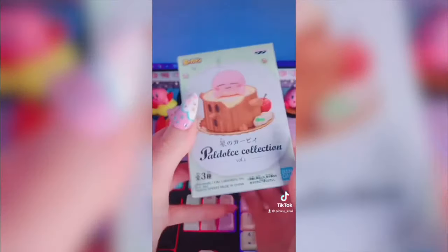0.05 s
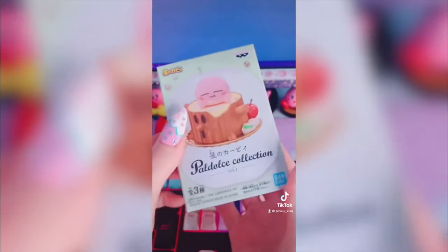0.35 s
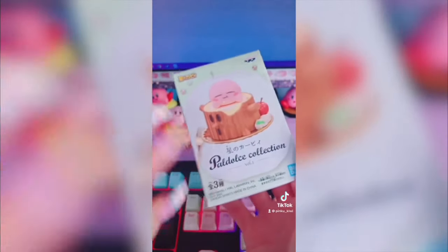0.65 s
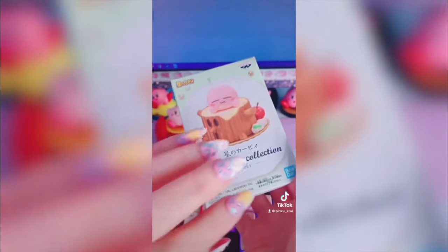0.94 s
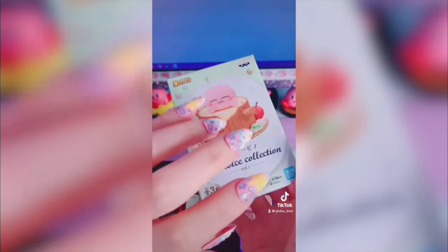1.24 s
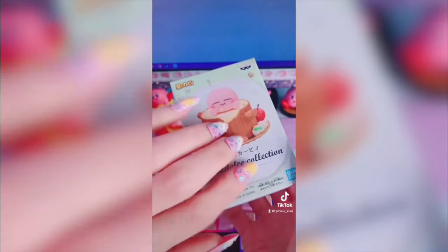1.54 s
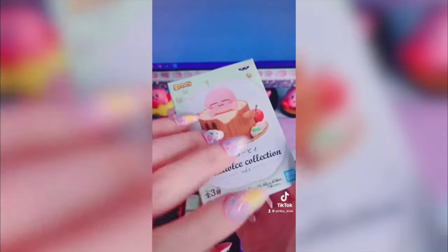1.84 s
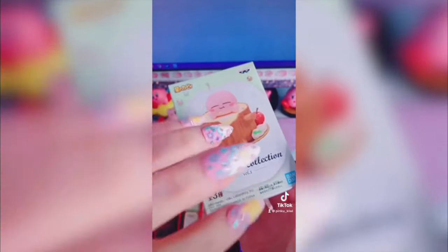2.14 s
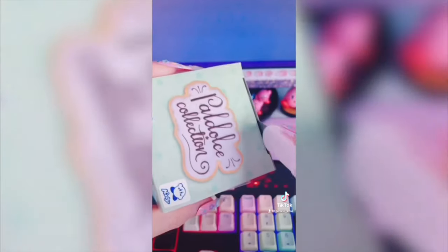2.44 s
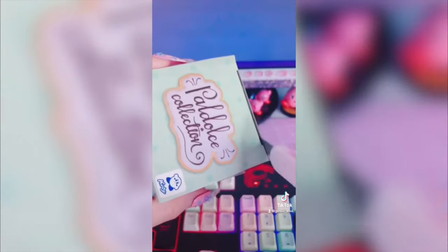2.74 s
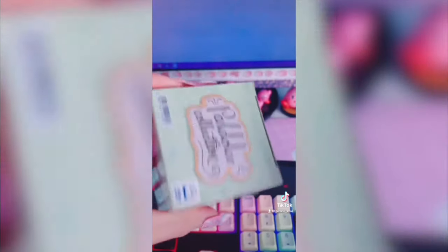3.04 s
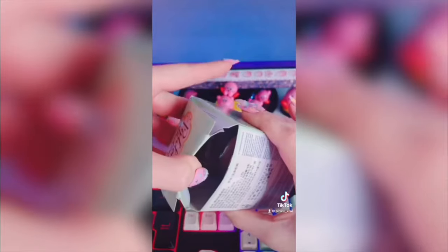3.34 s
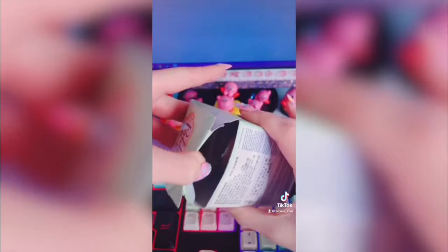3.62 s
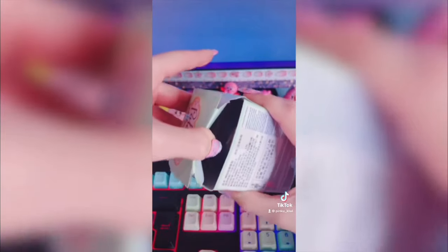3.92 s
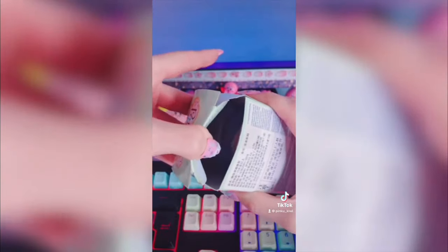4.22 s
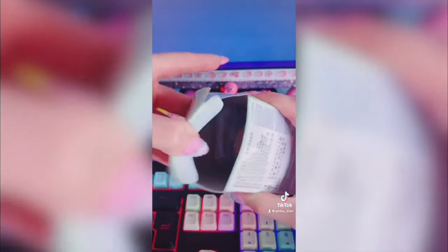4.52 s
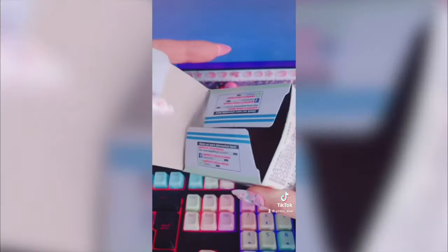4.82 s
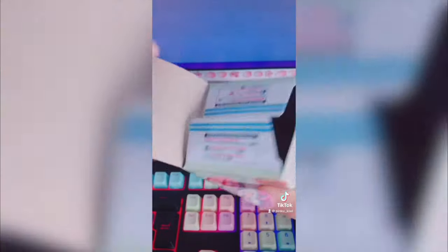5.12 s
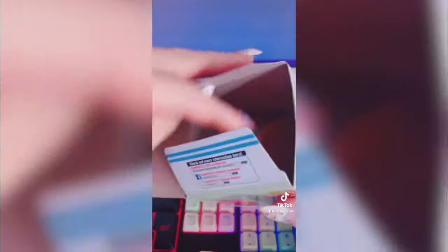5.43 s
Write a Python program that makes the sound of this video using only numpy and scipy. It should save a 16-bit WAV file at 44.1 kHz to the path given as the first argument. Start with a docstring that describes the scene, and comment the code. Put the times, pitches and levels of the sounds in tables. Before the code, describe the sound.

A small cardboard box is handled close to the microphone in a quiet room, with a low rumble from the hands throughout. After a faint rub at the start, long fingernails drum on the box from about 1.2 to 2 seconds, in two quick runs and a last light tap, each crisp and hollow with a faint echo. From 2.1 to 3 seconds, hands rub the card and turn it over, with a few clicks. A thumb starts rasping at the seam around 3.1 seconds, followed by scattered small cracks. From 4 seconds the tearing grows louder and more crackly, until the seam bursts with a sharp snap at about 4.4 seconds and the lid briefly scrapes free. From 4.8 to about 5.7 seconds, the flaps slide over each other with a softer, dry scraping and several light flicks.

```python
"""A small cardboard box is torn open close by: a thumb rasps along the seam, snapping fibres until
it bursts and the lid scrapes free. Before that, long fingernails drum on the box, ringing its walls
and the air inside, and hands rub on it as they turn it over. Afterwards the flaps slide apart and
are flicked back. Behind it all are a low rumble from the hands and a quiet room with a faint echo."""
import sys
import numpy as np
from scipy import signal
from scipy.fft import rfft, irfft, next_fast_len
from scipy.io import wavfile
from scipy.ndimage import uniform_filter1d, map_coordinates

SR = 44100
rng = np.random.default_rng(int(sys.argv[2]) if len(sys.argv) > 2 else 0)


def int16_out(signal):
    """Quantize to a 16-bit WAV file."""
    q = np.round(np.clip(np.atleast_2d(signal).T, -1, 1) * 32767)
    wavfile.write(sys.argv[1], SR, q.astype(np.int16))


N = 250047
GIVE_S = 4.418  # the moment the seam gives way
CLICK_HZ = 2500  # the walls sound below this, clicks and hiss above


# Thumb pushes on the seam. Each row: start and length in seconds, relative wall and fibre levels in dB.
THUMB_PUSHES = [(3.121, 0.035, -41.5, -49), (3.2, 0.037, -42, -50.5), (3.266, 0.027, -43.5, -51),
                (4.031, 0.041, -43, -47.5), (4.06, 0.053, -35.5, -46), (4.156, .032, -35, -42.5),
                (4.2, 0.041, -48, -60.5), (4.253, 0.038, -36.5, -45.5), (4.304, .114, -34.5, -45.5)]
# The freed lid brushes, then scrapes the rim. Each row: start and length in seconds, relative level in dB.
LID_STROKES = [(4.43, 0.048, -43.5), (4.472, 0.02, -24)]
# How the seam and the lid ring. Each row: pitch in Hz, width in Hz, relative level in dB.
SEAM_RINGS = [(327, 230, -5), (797, 179, 1), (943, 168, -2), (1503, 170, -3), (1740, 414, -8)]
LID_RINGS = [(626, 81, -7), (945, 50, 2.5), (1460, 100, 0), (2230, 98, -2.5), (4100, 1000, -11.5),
             (6200, 800, -13.5)]
# The tone of breaking fibres. Each row: frequency in Hz, relative level in dB.
FIBRE_TONE = [(1500, -30.5), (2400, -3.5), (4000, 1), (6000, 0.5), (7500, -7), (9500, -4), (11500, -11.5),
              (16000, -11)]

def tearing(fibre_db=-1, lid_db=-1, run_s=4.275, run_db=17.5):
    """Fibres catch and break by the thousand and shake the walls; then the lid scrapes free."""
    wall, _ = strokes(THUMB_PUSHES, attack_s=0.014, release_db_per_s=478.5, flutter_db=1.0)
    _, fibre = strokes(THUMB_PUSHES, attack_s=0.015, release_db_per_s=382, flutter_db=-0.5)
    # once the tear runs, the fibres grow louder until the seam gives
    fibre *= amp(np.interp(np.arange(N) / SR, [run_s, GIVE_S], [0, run_db], right=0))
    breaks = slips(rate=6000, spread_db=-1)
    bundles = slips(rate=350, spread_db=1.5)  # whole bundles part with a crisper tick
    crackle = shifting(coloured(breaks + amp(-7) * bundles, FIBRE_TONE), depth_db=2.5)
    body = resonated(breaks + amp(-5) * bundles, SEAM_RINGS)
    rasp = wall * body + amp(fibre_db) * fibre * crackle
    drag = slips(rate=12000, spread_db=1)
    lid = band(resonated(drag, LID_RINGS), [450, 7000], "bandpass")
    lid += amp(-17) * coloured(drag, FIBRE_TONE)  # torn fibres hiss on its edge
    contact, = strokes(LID_STROKES, attack_s=0.0059, release_db_per_s=2500.5)
    return band(rasp, 160, "highpass", order=2) + amp(lid_db) * contact * lid


# The last strip of card parts: start and length in seconds.
STRIP_RIP = (4.4280, .0065)

def burst(swing_hz=205, swing_s=0.015, jolt_hz=92, jolt_t60=0.12, rip_hz=3500, rip_width_hz=3200):
    """The seam lets go: the wall springs back and pumps the air, the box jolts, the last strip rips."""
    out = np.zeros(N)
    t = np.arange(round(swing_s * SR)) / SR
    add(out, GIVE_S, amp(-14) * np.sin(np.pi * t / swing_s) * np.sin(2 * np.pi * swing_hz * t))
    t = np.arange(SR // 5) / SR
    add(out, GIVE_S, amp(-32 - 60 * t / jolt_t60) * np.sin(2 * np.pi * jolt_hz * t))
    start, length = STRIP_RIP
    swell = np.hanning(round(length * SR))
    rip = resonated(rng.standard_normal(len(swell)), [(rip_hz, rip_width_hz, 0)])
    add(out, start, amp(-13) * swell * rip)
    return out


# Nails on the box. Each row: start in seconds, panel pitch in Hz, levels of the walls, the hollow
# inside and the click in dB, extra treble in the click in dB.
NAIL_TAPS = [(1.2001, 680, -46, -51, -54, -9), (1.2948, 670, -35, -46, -41, -5.5),
             (1.3555, 885, -31, -44, -37, 1), (1.6135, 700, -44.5, -54, -47, -3),
             (1.646, 660, -36.5, -38.5, -42, -2.5), (1.69, 670, -29, -38.5, -33.5, -9),
             (1.749, 850, -30.5, -49, -39.5, -2), (1.9927, 692, -47.5, -55.5, -47.5, -1)]
# How the closed box rings. Each row: pitch in Hz, relative level in dB, longest fade in seconds.
BOX_RINGS = [(136, -12, 0.031), (270, -12, 0.038), (374, -8, 0.038), (720, -4.5, 0.029),
             (1200, -5.5, 0.023), (1500, -3, 0.019), (2190, -10, 0.024), (2420, -5, 0.0083),
             (2940, -12, 0.013), (3480, -3.5, 0.011), (4060, -8.5, .02), (5580, -11, 0.02),
             (6900, -23, 0.054)]

def taps(panel_t60=0.025, tick_t60=0.016, nail_hz=4500, vary_db=2):
    """Each nail ticks on the card and rings the box, most of all the panel under it."""
    out, t = np.zeros(N), np.arange(SR // 10) / SR
    hz, db, t60 = np.transpose(BOX_RINGS)[:, :, None]  # t60: seconds to fade by 60 dB
    t60 = np.minimum(t60, 100 / hz)  # card soaks up motion: no ring outlasts a hundred cycles
    for start, panel_hz, *levels_db in NAIL_TAPS:
        strength = db + vary_db * rng.standard_normal(hz.shape)
        sign = rng.choice([-1, 1], hz.shape)  # where the nail lands sets which way each ring starts
        # resting fingers load the card and shift its higher rings from tap to tap
        pitch = hz * (1 + np.minimum(hz / 40000, 0.07) * rng.standard_normal(hz.shape))
        ring = np.sum(sign * amp(strength - 60 * t / t60) * np.sin(2 * np.pi * pitch * t), axis=0)
        panel = amp(-60 * t / panel_t60) * np.cos(2 * np.pi * panel_hz * t)
        noise = band(rng.standard_normal(len(t)), nail_hz, "lowpass", order=1)
        tick = amp(5 - 60 * t / tick_t60) * noise
        add(out, start, box_blow(ring + panel + tick, *levels_db))
    return out


# Short cracks and clicks. Each row: start in seconds, ring pitch in Hz, levels of the walls,
# the hollow inside and the click in dB, extra treble in the click in dB.
SHORT_CRACKS = [(2.2356, 805, -46.5, -47, -44.5, 12), (2.251, 730, -59, -53, -55.5, 3),
                (2.268, 687, -46, -46, -46.5, 8), (2.885, 4000, -77, -85, -75.5, 9),
                (3.115, 5500, -84, -97, -65.5, 4), (3.209, 750, -54, -60, -71, 12),
                (3.469, 754, -58.5, -63, -62, -0.5), (3.5733, 910, -65, -71, -60.5, 4),
                (3.6065, 3300, -71, -85, -70, -1), (3.629, 5570, -61, -77, -66, 3),
                (3.6471, 1504, -42.5, -91, -50, 5), (3.663, 1630, -50.5, -84, -66, 9),
                (3.8021, 940, -64.5, -75, -74.5, -2), (3.948, 780, -71, -82, -90, -6),
                (4.4176, 930, -36, -41, -41, 10), (4.4204, 816, -31, -33.5, -25.5, -2.5),
                (4.4283, 2210, -35.5, -40.5, -39.5, 1), (4.5985, 713, -56.5, -61, -70, 2.5),
                (4.707, 487, -69, -65.5, -76, -3), (5.0448, 717, -60, -69, -75, -12),
                (5.207, 1470, -46, -69, -58, -6), (5.212, 940, -47, -51.5, -48, -1),
                (5.3013, 520, -64, -55, -59.5, -11), (5.3849, 520, -54, -51.5, -66, 1),
                (5.5713, 1180, -46.5, -50.5, -54.5, 1), (5.6131, 2100, -61.5, -48.5, -52.5, 1),
                (5.6626, 990, -43, -50.5, -65, -6)]
# The tone of a crack. Each row: frequency in Hz, relative level in dB.
CRACK_TONE = [(60, -2.5), (170, 6.5), (300, 3.5), (480, -1.5), (800, 2), (1600, 2.5), (2600, -4.5),
              (4200, -3), (7000, -9), (11000, -16.5), (16000, -21)]

def cracks(rise_s=0.00074, crack_t60=0.034, ring_t60=0.035, hollow_hz=450):
    """Nails knock on the box, card buckles and flicks: each makes a short crack and a brief ring."""
    out, t = np.zeros(N), np.arange(SR // 10) / SR
    for start, ring_hz, *levels_db in SHORT_CRACKS:
        crack = coloured(rng.standard_normal(len(t)), CRACK_TONE)
        ring = resonated(rng.standard_normal(len(t)), [(ring_hz, 0.09 * ring_hz, 0)])
        # a small piece of card gives off little below its own pitch; the air inside supplies the lows
        crack = band(crack, max(hollow_hz, 0.8 * ring_hz), "highpass") + band(crack, hollow_hz, "lowpass")
        blow = crack * amp(-60 * t / crack_t60) + ring * amp(1 - 60 * t / ring_t60)
        add(out, start, box_blow((1 - np.exp(-t / rise_s)) * blow, *levels_db))
    return out


def box_blow(x, wall_db, hollow_db, click_db, crisp_db, crisp_hz=7500):
    """A blow is shared among the walls, the air inside and a click, crisper for a harder contact."""
    hollow = band(x, [125, 370], "bandpass", order=2)
    wall = band(x, [580, CLICK_HZ], "bandpass", order=2)
    click = band(x, CLICK_HZ, "highpass", order=2)
    click = band(click, crisp_hz, "lowpass") + amp(crisp_db) * band(click, crisp_hz, "highpass")
    return amp(wall_db) * unit(wall) - amp(hollow_db) * unit(hollow) - amp(click_db) * unit(click)


# Hands sliding. Each row: start and length in seconds, relative wall and hiss levels in dB.
PALM_STROKES = [(.08, 0.23, -76, -73.5), (2.12, 0.2, -50, -56.5), (2.27, 0.021, -40, -58),
                (2.32, 0.13, -58, -69), (2.43, 0.17, -53.5, -64), (2.485, .17, -49.5, -57),
                (2.53, 0.04, -42, -66), (2.728, 0.025, -50, -55.5), (2.78, 0.22, -67.5, -72.5),
                (3.47, 0.12, -60, -65.5)]
# The tone of skin on card. Each row: frequency in Hz, relative level in dB.
PALM_TONE = [(150, 8.5), (450, -9.5), (700, 1), (1100, -5.5), (2000, -8.5), (3200, -17), (5000, -20.5),
             (8500, -24.5), (11000, -30.5), (16000, -26.5)]

def turning():
    """Palms and fingertips rub the box as they turn it and shift their grip."""
    grip = strokes(PALM_STROKES, attack_s=0.022, release_db_per_s=602, flutter_db=1.0)
    return sliding(grip, PALM_TONE, rate=7700, wall_db=-5.0, hiss_db=-0.5)


# Flaps sliding. Each row: start and length in seconds, relative wall and hiss levels in dB.
FLAP_STROKES = [(4.81, 0.07, -60, -63), (4.86, .13, -58, -59.5), (5.0, 0.056, -57.5, -58),
                (5.07, 0.082, -62.5, -67), (5.122, 0.045, -48, -52), (5.18, 0.036, -57, -63),
                (5.22, .15, -46, -56), (5.315, .048, -49, -47.5), (5.39, 0.056, -56, -59.5),
                (5.47, 0.077, -63.5, -66), (5.55, 0.15, -45, -53.5)]
# The tone of card on card. Each row: frequency in Hz, relative level in dB.
FLAP_TONE = [(88, -27), (150, 6), (328, -1.5), (504, -0.5), (790, 5), (1080, -1), (1480, 0), (1790, -1.5),
             (2700, 1.5), (4160, -6.5), (4760, -12), (5360, -5), (7470, -15), (15100, -19.5), (16000, -24)]

def flaps():
    """The flaps rub over each other as they part."""
    contact = strokes(FLAP_STROKES, attack_s=0.018, release_db_per_s=700, flutter_db=1.2)
    return sliding(contact, FLAP_TONE, rate=6200, wall_db=-2.5, hiss_db=1.5)


def sliding(gains, tone, rate, wall_db, hiss_db):
    """Dry rubbing: tiny slips hiss at the contact and murmur in the walls."""
    wall, hiss = gains
    rub = shifting(coloured(slips(rate, spread_db=1.5), tone), depth_db=4)
    murmur = unit(band(rub, [220, CLICK_HZ], "bandpass", order=2))
    return amp(wall_db) * wall * murmur + amp(hiss_db) * hiss * unit(band(rub, CLICK_HZ, "highpass"))


# Card ringing briefly. Each row: start and length in seconds, pitch and width in Hz, level in dB.
CARD_RINGS = [(2.129, 0.1, 8100, 4000, -58.5), (2.529, 0.069, 4040, 700, -57),
              (2.543, 0.042, 620, 140, -47), (3.66, 0.066, 1640, 400, -56),
              (4.337, 0.083, 3760, 500, -39.5), (4.365, 0.045, 5570, 500, -51),
              (4.472, 0.028, 596, 110, -30.5), (4.977, 0.066, 3850, 880, -61),
              (5.108, 0.081, 3430, 820, -54), (5.236, 0.087, 3100, 935, -54),
              (5.394, 0.086, 2290, 218, -60.5)]

def card_rings():
    """Card rings briefly around one pitch: scraped edges, and a flap ringing on after a snap."""
    out = np.zeros(N)
    for start, length, hz, width, db in CARD_RINGS:
        progress = np.linspace(0, 1, round(length * SR))
        broad = resonated(rng.standard_normal(len(progress)), [(hz, 2 * width, 0)])
        ring = resonated(broad, [(hz, width, 0)])
        add(out, start, amp(db) * np.sqrt(4 * progress * (1 - progress)) * ring)
    return out


def desk(x, delay_s=0.0028, reflect_db=-19, dull_hz=3000):
    """The desk adds a weak, dull copy a moment later."""
    out = x.copy()
    add(out, delay_s, amp(reflect_db) * band(x, dull_hz, "lowpass", order=1))
    return out


# The tone the box sends into the room. Each row: frequency in Hz, gain in dB.
ECHO_TONE = [(80, -25), (150, -3.5), (430, -4), (800, 1), (1500, -3), (2500, -8), (5000, -14), (8000, -21),
             (16000, -34)]

def tap_echoes(boost_db=28.5):
    """All sides of the box sound into the room, so a tap's echo has a smoother tone than the tap."""
    out = np.zeros(N)
    for start, _, wall_db, *_ in NAIL_TAPS:
        add(out, start + 0.0025, amp(boost_db + wall_db) * room_tail())
    return filtered(out, lambda hz: amp(along(ECHO_TONE, hz)))


# How long the room rings. Each row: frequency in Hz, seconds to fade by 60 dB.
ROOM_FADE = [(150, 0.33), (1000, 0.47), (4000, .35), (12000, 0.15)]

def room_tail(build_s=0.0012):
    """A small room's echo builds up quickly, and its treble dies first."""
    hz, t, noise = signal.stft(rng.standard_normal(SR // 2), SR, nperseg=256)
    fade = amp(-60 * t / along(ROOM_FADE, hz)[:, None])
    tail = signal.istft(noise * fade * (1 - np.exp(-t / build_s)), SR, nperseg=256)[1]
    return tail / np.linalg.norm(tail)


# How strongly the hands rumble. Each row: time in seconds, relative level in dB.
RUMBLE_LEVELS = [(0.0, -63), (0.3, -66.5), (2.49, -60.5), (2.84, -63.5), (4.09, -64.5), (4.59, -60.5),
                 (4.85, -60.5), (5.67, -65.5)]
# The tones of the rumble and of the room's air. Each row: frequency in Hz, relative level in dB.
RUMBLE_TONE = [(12, -28), (20, -3), (32, -11.5), (48, 9), (86, -2.5), (112, -13.5), (144, -3.5),
               (200, -7.5), (260, -19.5), (440, -120)]
AIR_TONE = [(59, -32), (100, -10), (143, -1), (170, -12.5), (289, -10), (481, -22.5), (513, -20),
            (1080, -22.5), (1390, -22.5), (2270, -29), (3120, -30), (5300, -34), (16000, -39.5)]

def background(rumble_db=0.5, air_db=-65):
    """The dull rumble of hands on the box, over still room air."""
    hands_db = np.interp(np.arange(N) / SR, *np.transpose(RUMBLE_LEVELS))
    rumble = amp(rumble_db + hands_db) * coloured(rng.standard_normal(N), RUMBLE_TONE)
    return rumble + amp(air_db) * coloured(rng.standard_normal(N), AIR_TONE)


def strokes(rows, attack_s, release_db_per_s, flutter_db=0):
    """One loudness curve for each dB column: a stroke takes hold, flutters with the grip and dies away."""
    t = np.arange(N) / SR
    power = 0
    for start, length, *levels_db in rows:
        rise = np.clip((t - start) / attack_s, 0, 1)
        fall = amp(-release_db_per_s * np.maximum(t - start - length, 0))
        power = power + np.outer(amp(levels_db), rise * fall) ** 2
    return np.sqrt(power) * amp(flutter_db * wobble(rate=70))


def slips(rate, spread_db):
    """A surface sticks and slips: tiny uneven clicks at random times, about rate a second."""
    happens = rng.random(N) < rate / SR
    return unit(happens * rng.standard_normal(N) * amp(spread_db * rng.standard_normal(N)))


def shifting(x, depth_db):
    """A moving contact keeps changing how the card rings: patches of the tone rise and fall at random."""
    spectrum = signal.stft(x, nperseg=512)[2]
    patches = uniform_filter1d(rng.standard_normal(spectrum.shape), size=5, axis=0)
    patches = uniform_filter1d(patches, size=9, axis=1)
    return unit(signal.istft(spectrum * amp(depth_db * unit(patches)), nperseg=512)[1][:N])


def wobble(rate):
    """A smooth curve through rate random points a second."""
    return map_coordinates(rng.standard_normal(int(N * rate / SR) + 4), [np.arange(N) * rate / SR])


def resonated(x, peaks):
    """Ring x at each (pitch in Hz, width in Hz, dB) peak, at an average level of 1."""
    def response(f):
        return sum((-1) ** k * amp(db) * 1j * f * width / (hz * hz - f * f + 1j * f * width)
                   for k, (hz, width, db) in enumerate(peaks))
    return unit(filtered(x, response))


def coloured(x, tone):
    """Shape x with a tone table, at an average level of 1."""
    return unit(filtered(x, lambda hz: amp(along(tone, hz))))


def filtered(x, response):
    """Scale each frequency in x by response(Hz)."""
    size = next_fast_len(len(x) + 8192)
    return irfft(rfft(x, size) * response(np.fft.rfftfreq(size, 1 / SR)), size)[:len(x)]


def band(x, edges_hz, kind, order=3):
    """Keep the lows, the highs or a band between."""
    return signal.sosfilt(signal.butter(order, edges_hz, kind, fs=SR, output="sos"), x)


def along(points, hz):
    """Read between (Hz, value) points on a log scale."""
    known_hz, values = np.transpose(points)
    return np.interp(np.log(hz + 1), np.log(known_hz + 1), values)


def add(track, start_s, sound):
    """Mix a sound into the track."""
    span = track[round(start_s * SR):][:len(sound)]
    span += sound[:len(span)]


def amp(db):
    """Decibels to gain."""
    return 10 ** (np.asarray(db) / 20)


def unit(x):
    """Scale to an average (rms) level of 1."""
    return x / np.sqrt(np.mean(x ** 2) + 1e-20)


def scene(room_db=-20):
    """The box close by, the room faintly behind it."""
    handling = turning() + flaps() + cracks() + burst() + tearing() + card_rings()
    drumming = desk(taps()) + tap_echoes()
    echo = signal.fftconvolve(handling, room_tail())[:N]
    return (handling + drumming + amp(room_db) * echo + background())[None]


def record(dry, top_hz=16000):
    """The very highest treble is cut off steeply."""
    return filtered(dry[0], lambda hz: 1 / (1 + (hz / top_hz) ** 120))[None]


dry = scene()
out = record(dry)
int16_out(out)
```